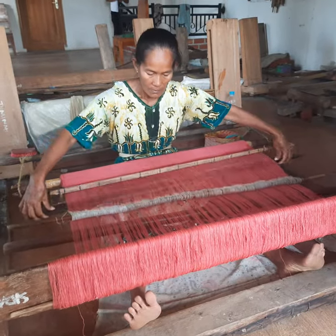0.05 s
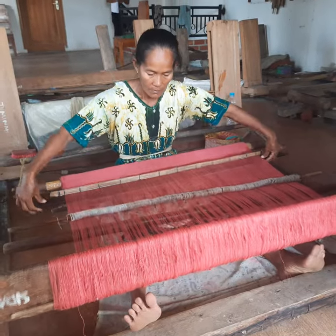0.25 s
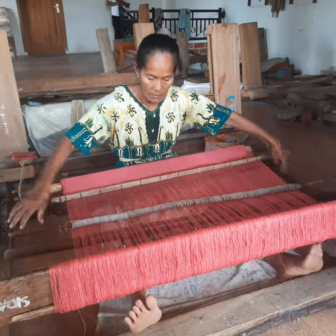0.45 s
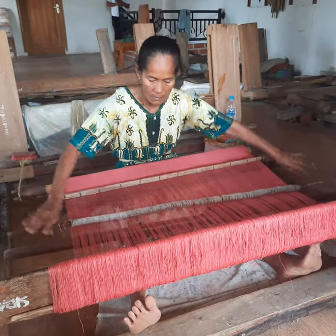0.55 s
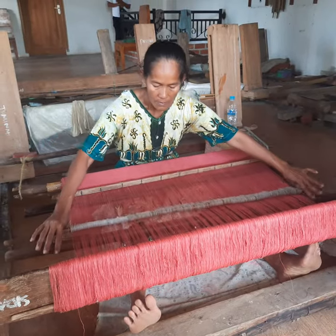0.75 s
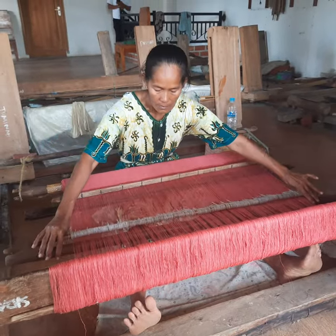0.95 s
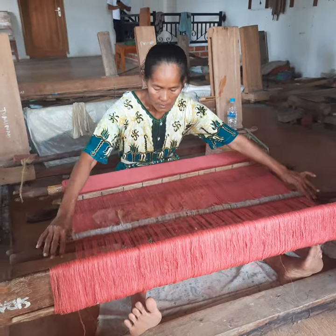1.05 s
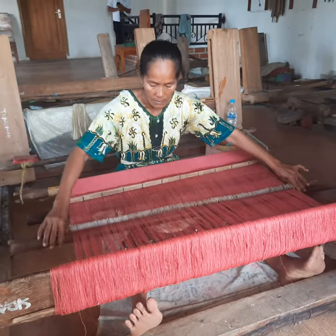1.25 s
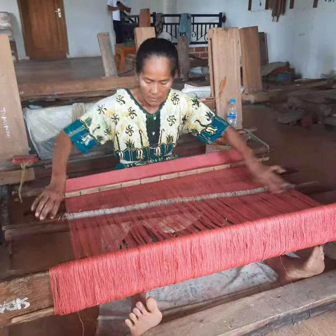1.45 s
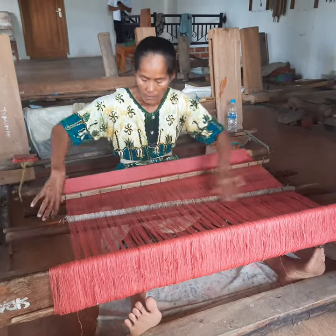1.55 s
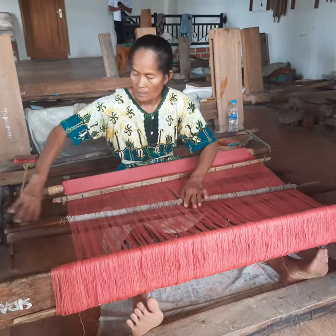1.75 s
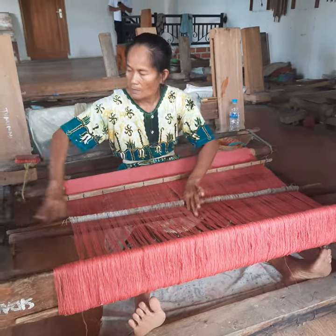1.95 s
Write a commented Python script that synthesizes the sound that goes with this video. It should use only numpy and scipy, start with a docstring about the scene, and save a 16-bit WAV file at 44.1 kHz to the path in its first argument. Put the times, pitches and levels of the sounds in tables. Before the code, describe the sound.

Hard wood clacks twice in rapid succession on a hand loom, close to the microphone in a roomy, live interior, with dull echoes following, then a tiny scuff and soft low background swells.

```python
"""The tail of an earlier knock is dying away as a wooden beater knocks twice against the cloth of a hand loom.
Each knock is a quick run of contacts: sticks crack (noise bursts), the frame rings (decaying sines); two late
dull returns follow, like echoes from a far wall. The reverberant hall answers with slowly fading noise.
Then a stick taps faintly (noise bursts), over a noise floor and low drone (narrow noise) with slow swells of
hiss, a few soft bumps and, at the end, low swells that rise quickly and die away (all coloured noise)."""
import sys
import numpy as np
from scipy import signal
from scipy.io import wavfile

SR = 44100
rng = np.random.default_rng(int(sys.argv[2]) if len(sys.argv) > 2 else 0)


def digitize_waveform(pressure):
    """Quantize a signal to 16-bit integers and store it at the path in sys.argv[1].

    Rows of a 2-D input are taken as channels; values are limited to [-1, 1].
    """
    field = np.atleast_2d(pressure).T
    bounded = np.clip(field, -1, 1)
    quanta = np.round(bounded * 32767).astype(np.int16)
    wavfile.write(sys.argv[1], SR, quanta)


N = 88200

# Wood meets wood; the last two rows are late dull returns, like echoes from a far wall. Levels relative:
# t/s, frame ring level/dB, crack level/dB, crack tilt/(dB per octave), treble corner f/Hz, hall send level/dB
CONTACTS_AND_RETURNS = [ (-0.16, -4.5, -3, -2, 16000, -1), (0.2392, -27, -21, 9, 17000, -1),
                        (0.2424, -38, -14, 2.5, 17000, -2.5), (0.2466, -34, -6, -0.5, 11000, 5),
                        (0.2482, -7.5, -10.5, 2.5, 11000, 2.5), (0.3275, -9.5, -5.5, -0.5, 8400, -1.5),
                        (0.3323, -6, -2.5, -1, 7500, -1.5), (0.3390, -9.5, -15, -5.5, 5000, -7),
                        (0.4120, -13.5, -12, -6.5, 3940, -5), (0.4428, -13, -35, -9, 4000, 1)]
# Crack of the sticks, relative spectrum: f/Hz, level/(dB per Hz)
CRACK_SPECTRUM = [(30, -60), (100, -21), (300, -3), (800, -1.5), (1250, -3.5), (2500, 0), (4000, -5),
                  (5800, -11), (7500, -8.5), (9000, -19), (11000, -12.5), (15500, -14.5)]
# Modes of the wooden frame, levels relative: f/Hz, level/dB, t60/s, level in the hall/dB
FRAME_MODES = [(235, -14, 0.067, -16), (266.3, -14.5, 0.17, -19), (306, -16.5, 0.093, -24),
               (425.4, -19.5, 0.17, -17.5), (511, -12.5, 0.096, -11), (561.6, -9.5, 0.077, -15),
               (579, -2, 0.077, -9.5), (760, -20.5, 0.078, -27), (784.5, -19.5, 0.12, -16),
               (1010, -8.5, 0.041, -23.5), (1061, -28.5, 0.12, -20), (1495, -39, 0.043, -34),
               (1607, -13.5, 0.064, -23.5), (2259, -40, 0.059, -19), (2655, -25, .07, -36)]
# Reverberation of the hall, level relative: f/Hz, t60/s, level/dB
HALL = [(100, 1.32, 13.5), (250, 1.236, -4), (586, 1.157, 1), (1296, 0.92, 0), (2500, 0.87, -2),
        (5300, 0.79, -1.5), (7700, 0.7, -5.5), (13700, 0.48, -6)]
# How alike left and right are: f/Hz, correlation
LIKENESS = [(40, 0.32), (125, 0.96), (300, 0.77), (600, 0.61), (1200, 0), (3000, 0), (15000, 0.091)]
# A stick scuffs against the warp: t/s, level/dB, tilt/(dB per octave), treble corner f/Hz
TAPS = [(1.0717, -39.5, -1.5, 2200), (1.1119, -37.5, -0.5, 16800)]
# Scuff of the stick, relative spectrum: f/Hz, level/(dB per Hz)
TAP_SPECTRUM = [(100, -30), (500, -36), (850, 2), (1500, 2), (2700, -0.5), (3700, 0.5), (5500, -19),
                (9500, -22), (13000, -8), (16000, -13)]
# Slow swells of the background noise, mostly hiss: t at the peak/s, length (standard deviation)/s, level/dB,
# tilt/(dB per octave)
HISS_SWELLS = [(0.05, 0.21, -52.5, 2), (0.85, 0.051, -60.5, 2), (1.215, 0.11, -74, 6.5),
               (1.586, 0.058, -49.5, -6.5), (1.903, 0.14, -56, 1.7)]
# Hiss of these swells, relative spectrum: f/Hz, level/(dB per Hz)
HISS_SPECTRUM = [(200, -44), (1000, -2), (2500, 4), (7000, -3), (10000, -6), (15000, -5)]
# Three soft bumps, then (from 1.591 s) low swells in the background, perhaps a distant engine:
# t/s, level/dB, tilt/(dB per octave), t60/s
BUMPS_AND_LOW_SWELLS = [(0.01, -47.5, -4.5, 1), (0.665, -60, -5, 0.12), (1.391, -47, 4, 0.27),
                        (1.591, -42, 1.5, 0.63), (1.698, -46.5, 3.5, 1), (1.851, -48.5, -1.5, 1)]
# Bumps and low swells, relative spectrum: f/Hz, level/(dB per Hz)
LOW_SPECTRUM = [(25, -55), (60, 22), (120, -3), (270, 6), (400, -10), (700, -9), (3000, -57), (15000, -54)]
# Steady background noise, relative spectrum: f/Hz, level/(dB per Hz)
FLOOR_SPECTRUM = [(25, -31), (60, -6), (125, -4), (200, -8.5), (350, -5.5), (520, -17.5), (1000, -22),
                  (2200, -21.5), (4000, -26.5), (7200, -27.5), (9500, -37), (15000, -33.5)]
# Low resonances of the background: f/Hz, width of each of two filter passes/Hz, level/dB
DRONE = [(162.7, 7.9, -53), (247.9, 29, -60)]

CRACK_DB, CRACK_PAN_DB, CRACK_ATTACK_S = -5, 2, 0.00056
CRACK_T60_S, CRACK_SHORTENS = 0.028, 0.37  # t60 at 2 kHz; power by which it falls with pitch
TILT_FROM_HZ = 660  # the cracks differ in tilt only above this pitch
FRAME_PAN_DB, FRAME_HALL_DB = 5, -11
FRAME_SWELL_S, FRAME_LOW_HZ = 0.0065, 135  # the frame takes a moment to respond and radiates little bass
WALL_DELAY_S, WALL_DB = 0.019, -10.5  # echo from a near wall
HALL_DELAY_S, HALL_BUILD_S, HALL_PAN_DB = 0.002, 0.01, 3
HALL_WIDTH_HZ, HALL_WIDTH_SHARE = 18.6, 0.051  # filter width of a mode in the hall: base, share of its pitch
TAP_ATTACK_S, TAP_T60_S, TAP_HALL_DB = 0.0017, 0.051, -14
LOW_ATTACK_S = 0.012
FLOOR_DB, FLOOR_PAN_DB = -47.5, 3
CUTOFF_HZ, CEILING = 16000, 1.3

LEAD = int(0.5 * SR)  # samples of run-up, so that the earlier knock can begin before time zero
TIME = np.arange(N) / SR
EDGES = np.geomspace(22, 17000, 27)  # band edges, Hz
CENTRES = np.sqrt(EDGES[1:] * EDGES[:-1])
BANK = [signal.butter(2, pair, "band", fs=SR, output="sos") for pair in zip(EDGES, EDGES[1:])]


def knocks():
    """The cracks and the ringing frame, with its wall echo and reverberation."""
    ring = frame()
    echo = from_db(WALL_DB) * np.interp(TIME - WALL_DELAY_S, TIME, ring)
    return cracks() + pan(FRAME_PAN_DB) * (ring + echo) + frame_in_hall()


def cracks():
    """Contacts and late returns are short noise bursts, whose energy lingers in the hall as a smooth wash."""
    t60 = (CRACK_T60_S * (CENTRES / 2000) ** -CRACK_SHORTENS)[:, None]
    octaves = np.log2(np.maximum(CENTRES, TILT_FROM_HZ) / 2000)
    short = burst(TIME[:SR // 8], CRACK_ATTACK_S, t60)[:, None]

    hall_t60 = per_band(HALL, axis=1)[:, None]
    # a longer crack feeds more energy into the hall
    hall_gain = from_db(per_band(HALL, axis=2))[:, None] * np.sqrt(t60 / hall_t60)
    lingering_power = (hall_gain * burst(TIME - HALL_DELAY_S, HALL_BUILD_S, hall_t60)) ** 2

    direct = np.zeros((2, LEAD + N))
    hall_power = np.zeros((len(CENTRES), LEAD + N))
    for s, _, crack_db, tilt_db, corner_hz, hall_db in CONTACTS_AND_RETURNS:
        level = from_db(CRACK_DB + crack_db + tilt_db * octaves)
        gains = level * colour(CRACK_SPECTRUM) * dulled(corner_hz)
        crack = mix(gains, noise_bands(short.shape[-1]) * short)
        add(direct, s, pan(CRACK_PAN_DB) * crack)
        add(hall_power, s, (from_db(hall_db) * gains[:, None]) ** 2 * lingering_power)
    wash = np.sum(np.sqrt(hall_power[:, None, LEAD:]) * noise_bands(N), axis=0)
    return direct[:, LEAD:] + pan(HALL_PAN_DB) * wash


def frame():
    """The wooden frame's modes ring as decaying sines, at the contacts and again at the late returns."""
    t = np.arange(SR // 2) / SR
    ring = sum(from_db(db) * np.sin(2 * np.pi * hz * t) * burst(t, FRAME_SWELL_S, t60)
               for hz, db, t60, _ in FRAME_MODES)
    out = np.zeros((1, LEAD + N))
    for s, ring_db, *_ in CONTACTS_AND_RETURNS:
        add(out, s, from_db(ring_db) * ring[None])
    bass_cut = signal.butter(2, FRAME_LOW_HZ, "high", fs=SR, output="sos")
    return signal.sosfilt(bass_cut, out)[0, LEAD:]


def frame_in_hall():
    """Each mode lingers in the hall as a wavering cluster; the energies of contacts and returns add up."""
    out = 0
    for hz, _, _, mode_db in FRAME_MODES:
        t60 = np.interp(hz, CENTRES, per_band(HALL, axis=1))
        alike = np.clip(np.interp(hz, CENTRES, per_band(LIKENESS)), -.99, .99)
        power = sum((from_db(ring_db + hall_db) * burst(TIME - s - HALL_DELAY_S, HALL_BUILD_S, t60)) ** 2
                    for s, ring_db, *_, hall_db in CONTACTS_AND_RETURNS)
        mid, side = narrow_noise(hz, HALL_WIDTH_HZ + HALL_WIDTH_SHARE * hz)
        out = out + from_db(mode_db) * np.sqrt(power) * stereo(mid, side, alike)
    return from_db(FRAME_HALL_DB) * pan(HALL_PAN_DB) * out


def taps():
    """Light scuffs of a stick: short noise bursts, each with a faint tail from the hall."""
    bands = noise_bands(N)
    hall_t60 = per_band(HALL, axis=1)[:, None, None]
    out = 0
    for s, db, tilt_db, corner_hz in TAPS:
        scuff = burst(TIME - s, TAP_ATTACK_S, TAP_T60_S)
        tail = from_db(TAP_HALL_DB) * burst(TIME - s, HALL_BUILD_S, hall_t60)
        gains = colour(TAP_SPECTRUM, tilt_db) * dulled(corner_hz)
        out = out + from_db(db) * mix(gains, bands * (scuff + tail))
    return out


def bumps_and_swells():
    """Bumps, low swells and hiss swells, all shaped from the same noise."""
    bands = noise_bands(N)
    return bumps_and_low_swells(bands) + hiss_swells(bands)


def bumps_and_low_swells(bands):
    """Soft bumps, then low background swells: mostly low noise that rises quickly and dies away."""
    out = 0
    for s, db, tilt_db, t60 in BUMPS_AND_LOW_SWELLS:
        low_noise = mix(colour(LOW_SPECTRUM, tilt_db, pivot_hz=192), bands)
        out = out + from_db(db) * burst(TIME - s, LOW_ATTACK_S, t60) * low_noise
    return out


def hiss_swells(bands):
    """The background noise, mostly hiss, swells slowly along smooth bell curves."""
    out = 0
    for s, length, db, tilt_db in HISS_SWELLS:
        swell = np.exp(-((TIME - s) / length) ** 2 / 2)
        out = out + from_db(db) * swell * mix(colour(HISS_SPECTRUM, tilt_db), bands)
    return out


def background():
    """Low rumble and faint hiss, with a wavering drone of narrow noise."""
    drone = sum(from_db(db) * narrow_noise(hz, width)[0] for hz, width, db in DRONE)
    return drone + from_db(FLOOR_DB) * mix(colour(FLOOR_SPECTRUM), noise_bands(N))


def from_db(db):
    """Decibels to gain."""
    return 10 ** (np.asarray(db) / 20)


def pan(db):
    """Left and right gains for a level difference; positive leans left."""
    return from_db([[db / 2], [-db / 2]])


def per_band(table, axis=1):
    """One column of a table, read at the band centres."""
    table = np.array(table)
    return np.interp(np.log(CENTRES), np.log(table[:, 0]), table[:, axis])


def noise_bands(size):
    """White stereo noise split into bands (band, channel, sample), each with its left-right likeness."""
    white = rng.standard_normal((2, 2, size + 4096))  # the extra samples let the filters settle
    bands = []
    for k, alike in enumerate(np.clip(per_band(LIKENESS), -.99, .99)):
        # neighbouring bands take turns between two unrelated noises
        mid, side = signal.sosfilt(BANK[k], white[k % 2])[:, -size:]
        bands.append(stereo(mid, side, alike))
    return np.array(bands)


def narrow_noise(hz, width):
    """Two unrelated noises, each passed twice through one resonance; rms 1."""
    b, a = signal.iirpeak(hz, hz / width, fs=SR)
    once = signal.lfilter(b, a, rng.standard_normal((2, LEAD + N)))
    tone = signal.lfilter(b, a, once)[:, LEAD:]
    return tone / tone.std()


def stereo(mid, side, alike):
    """Left and right with a given correlation, from two unrelated noises."""
    return np.sqrt((1 + alike) / 2) * mid + np.sqrt((1 - alike) / 2) * np.array([side, -side])


def colour(spectrum, tilt_db=0, pivot_hz=2000):
    """Band gains that give noise of rms 1, then tilted about a pivot."""
    gain = from_db(per_band(spectrum))
    gain = gain / np.sqrt(np.sum(gain ** 2 * np.diff(EDGES)) * 2 / SR)
    return gain * from_db(tilt_db * np.log2(CENTRES / pivot_hz))


def dulled(corner_hz):
    """Band gains of a dull sound, which lacks the treble above its corner."""
    return 1 / np.sqrt(1 + (CENTRES / corner_hz) ** 6)


def mix(gains, bands):
    """Weighted sum of bands."""
    return np.tensordot(gains, bands, 1)


def decay(t, t60):
    """Exponential fall by 60 dB in t60."""
    return np.exp(-np.log(1000) * t / t60)


def burst(t, attack, t60):
    """A quick rise from time zero under an exponential fall."""
    return np.clip(t / attack, 0, 1) * decay(abs(t), t60)


def add(track, s, sound):
    """Lay a sound on a track that begins LEAD samples early."""
    start = max(int(s * SR) + LEAD, 0)
    part = sound[:, :track.shape[1] - start]
    track[:, start:start + part.shape[1]] += part


def scene():
    """The loom in its hall and the background, a little to the left."""
    return knocks() + pan(FLOOR_PAN_DB) * (taps() + bumps_and_swells() + background())


def record(dry):
    """The highest peaks are softly rounded and the top of the treble is cut."""
    rounded = CEILING * np.tanh(dry / CEILING)
    top_cut = signal.ellip(10, .1, 80, CUTOFF_HZ, fs=SR, output="sos")
    return signal.sosfilt(top_cut, rounded)


dry = scene()
out = record(dry)
digitize_waveform(out)
```